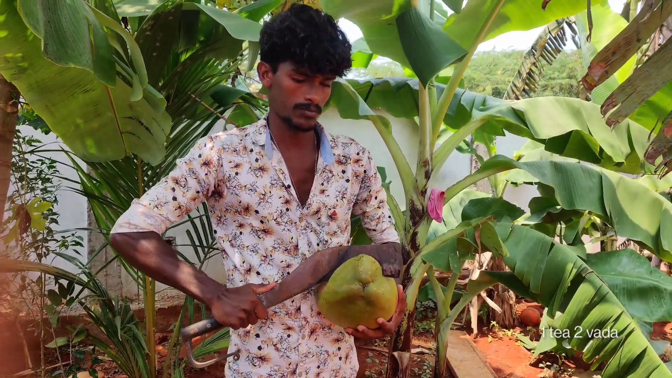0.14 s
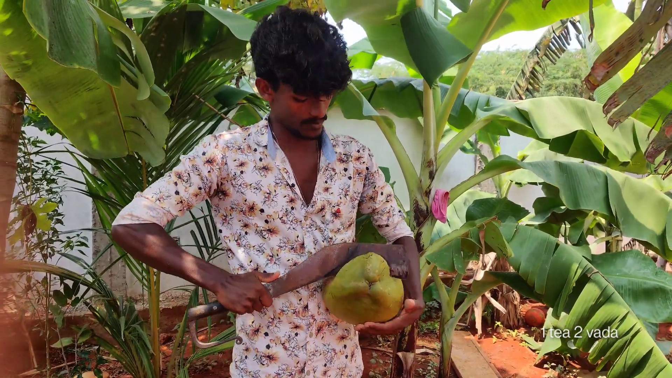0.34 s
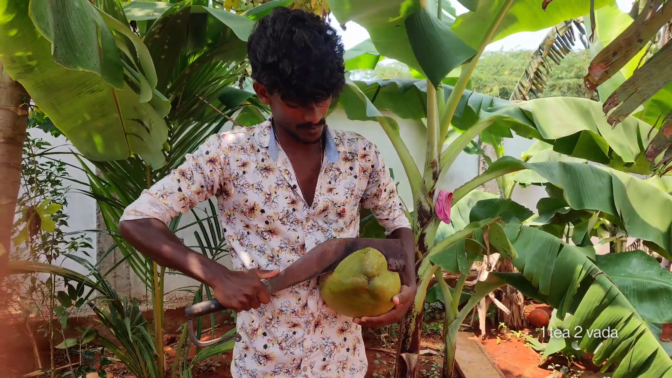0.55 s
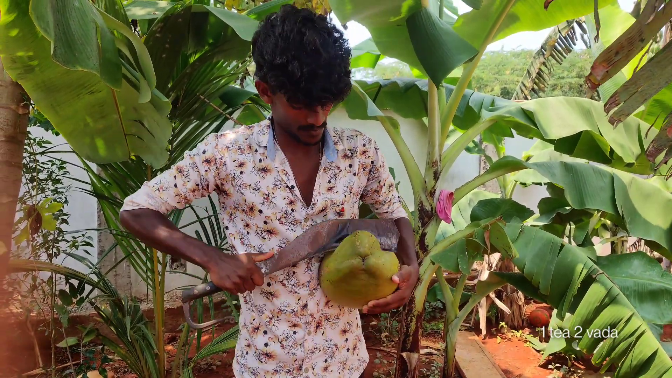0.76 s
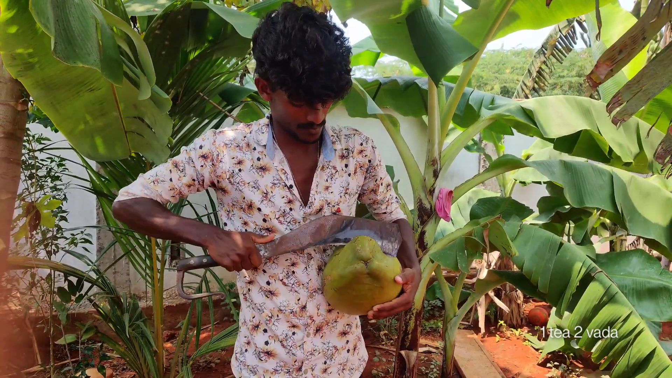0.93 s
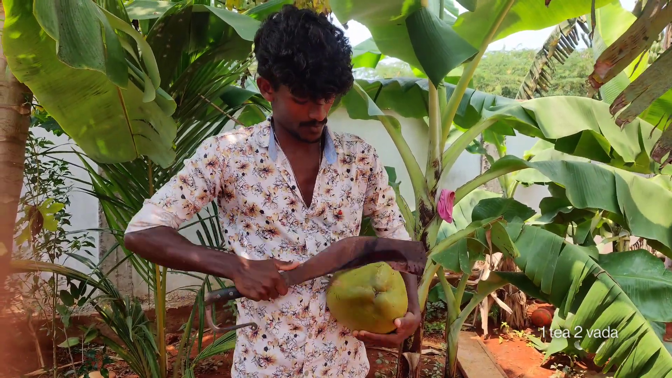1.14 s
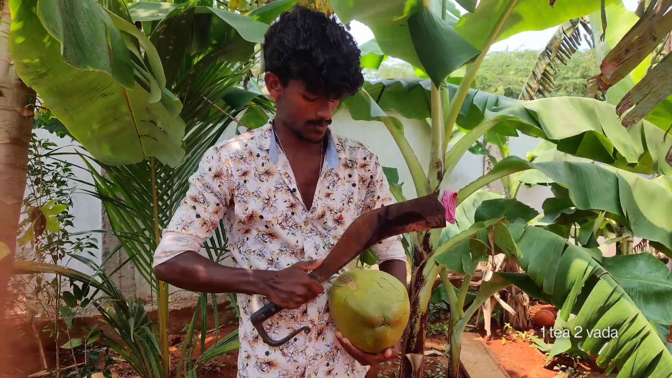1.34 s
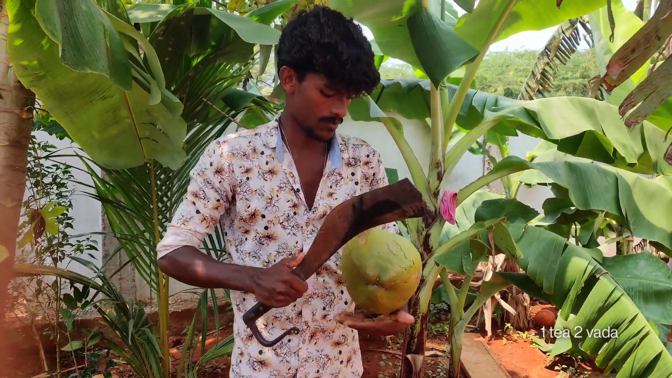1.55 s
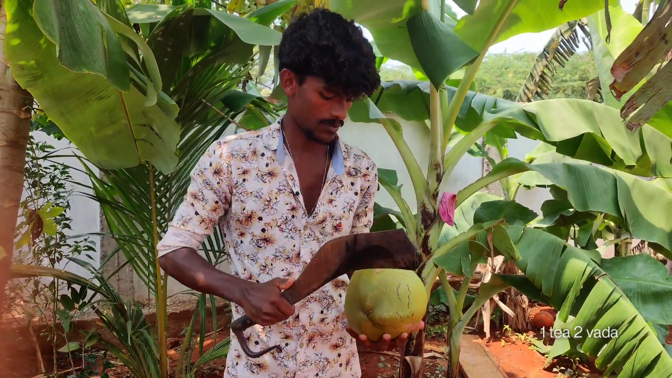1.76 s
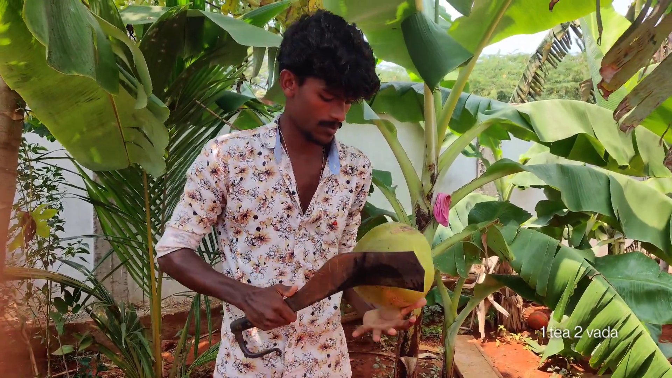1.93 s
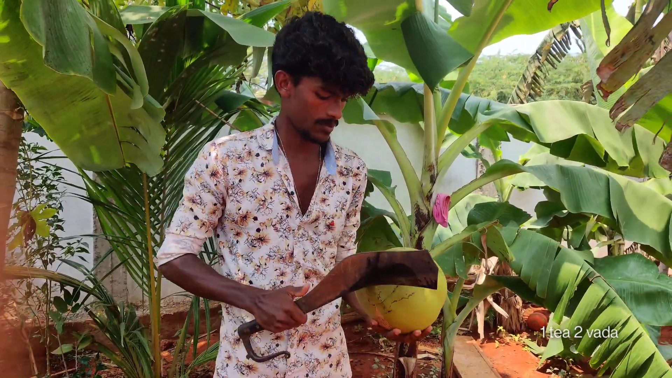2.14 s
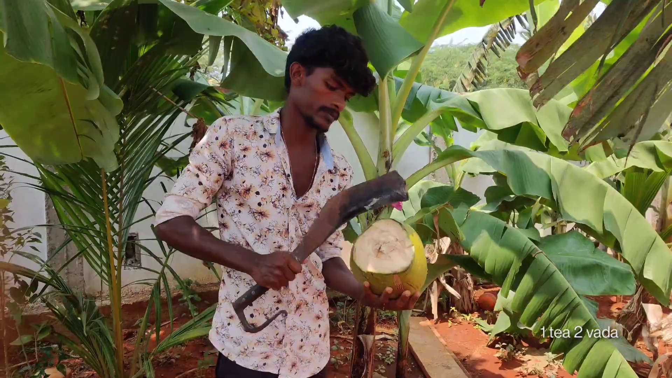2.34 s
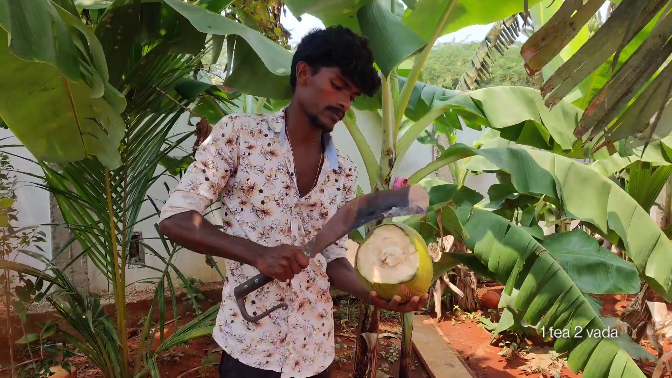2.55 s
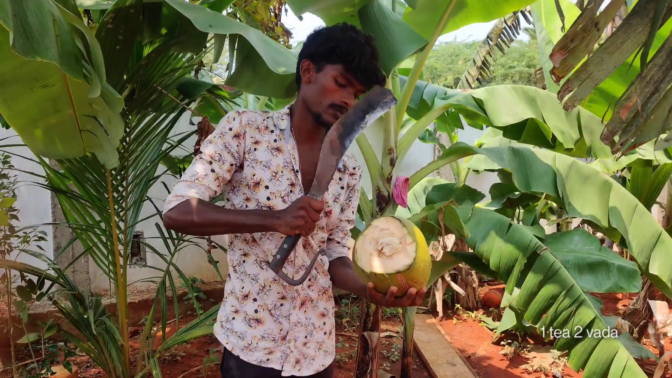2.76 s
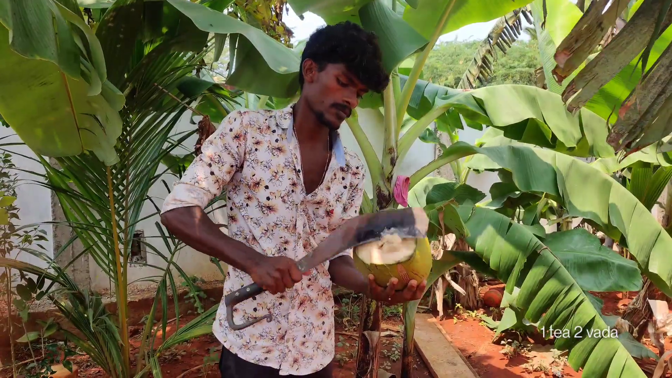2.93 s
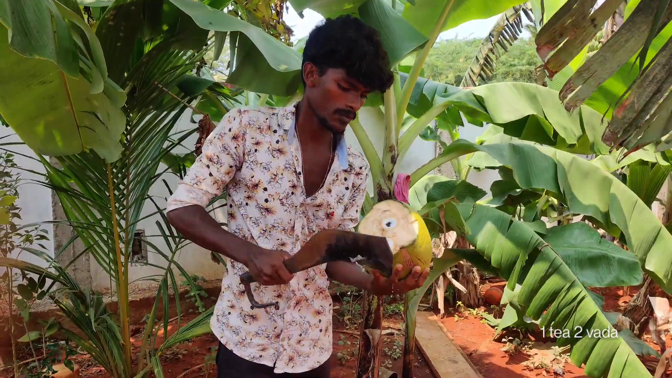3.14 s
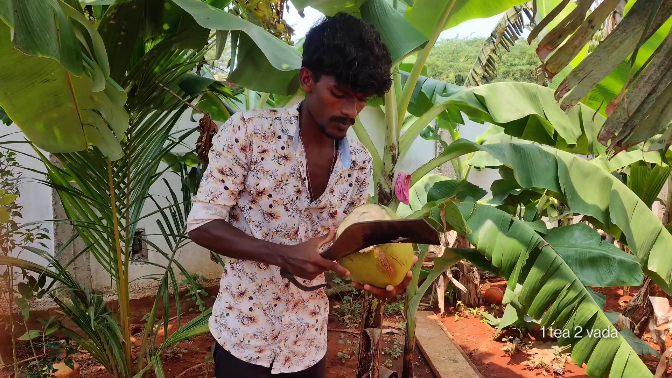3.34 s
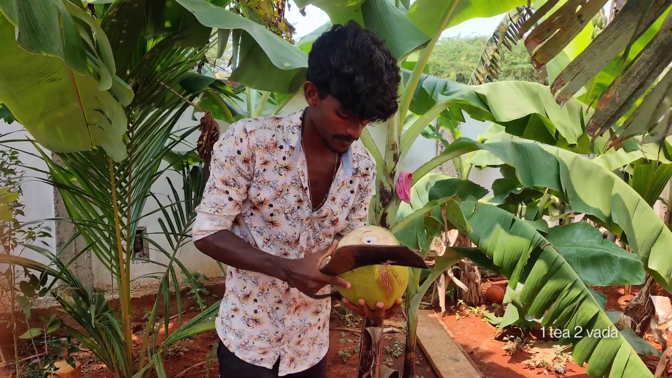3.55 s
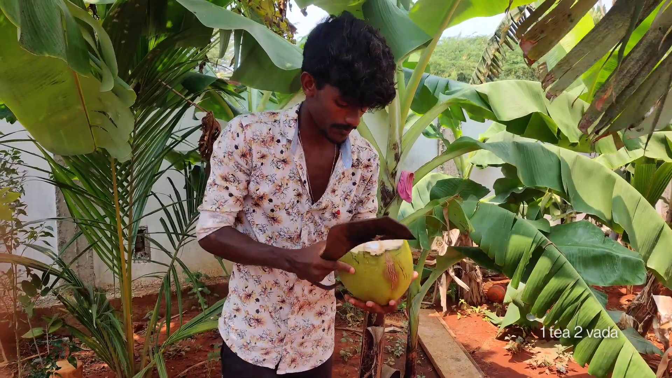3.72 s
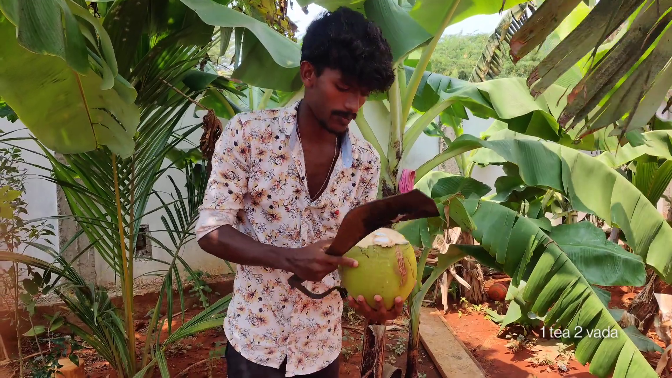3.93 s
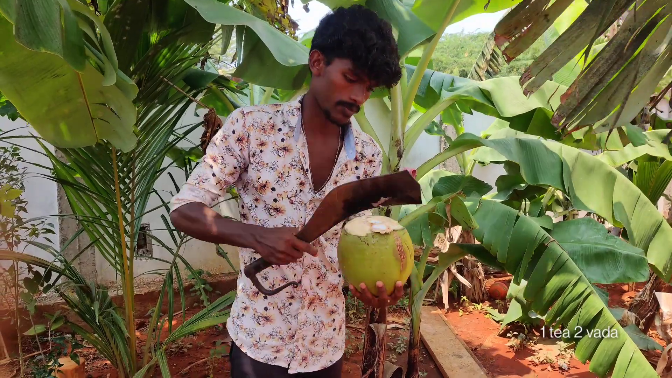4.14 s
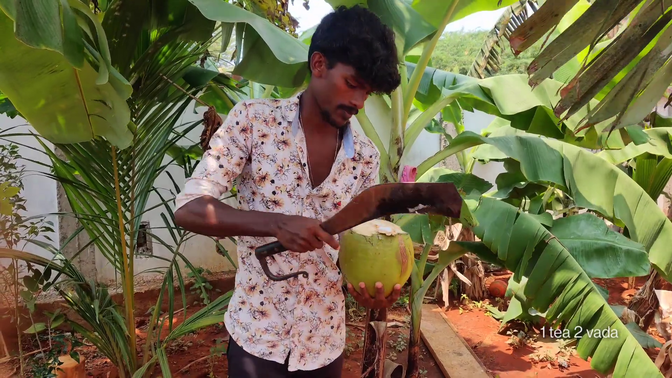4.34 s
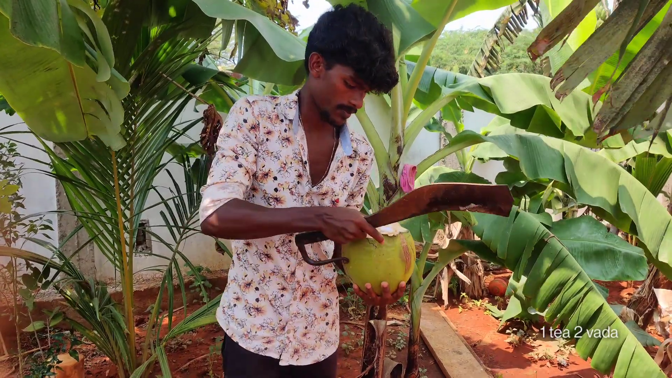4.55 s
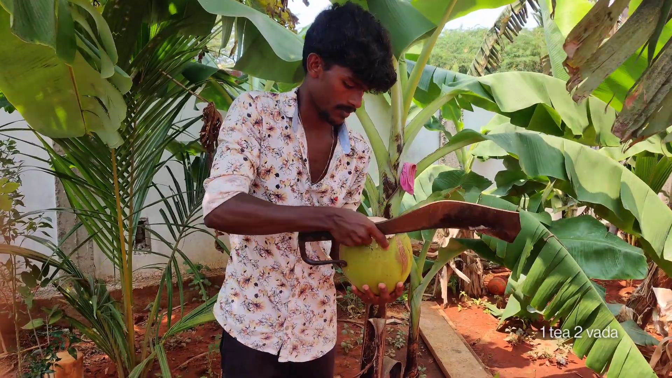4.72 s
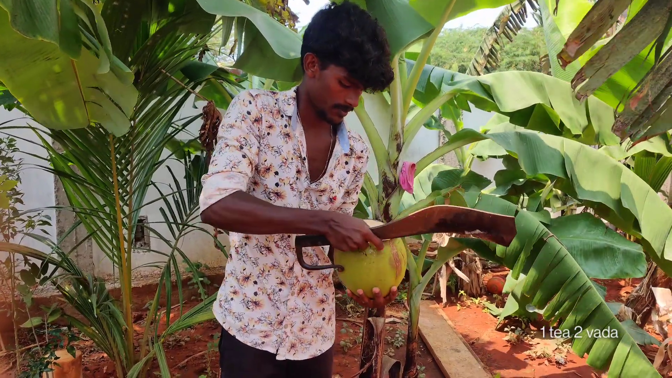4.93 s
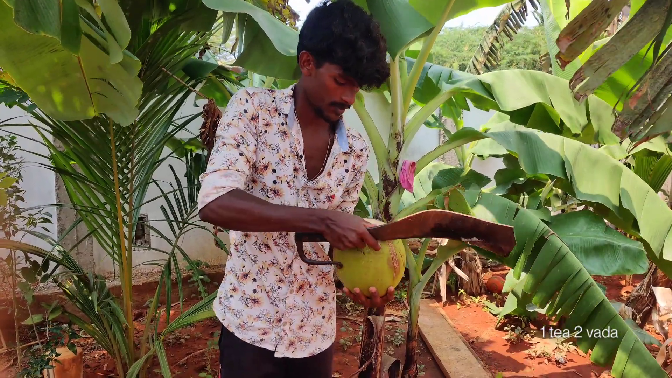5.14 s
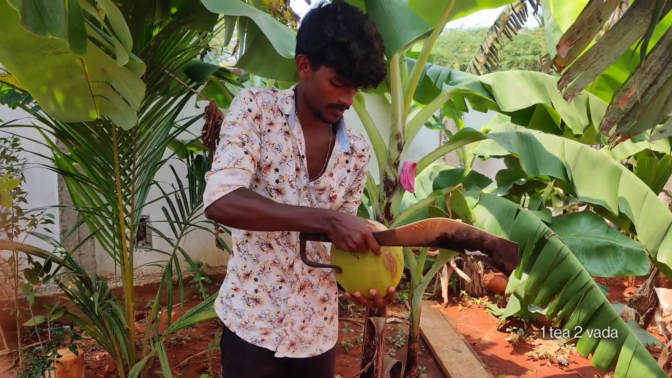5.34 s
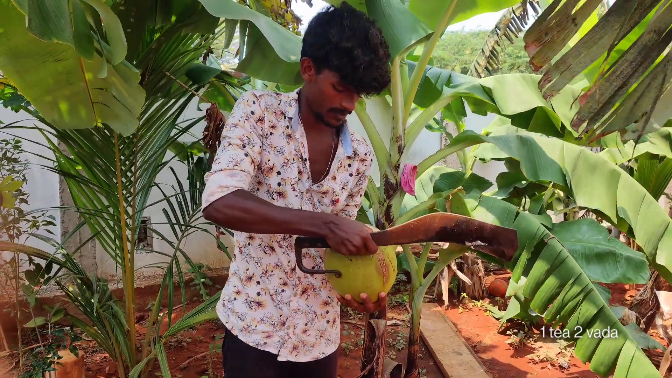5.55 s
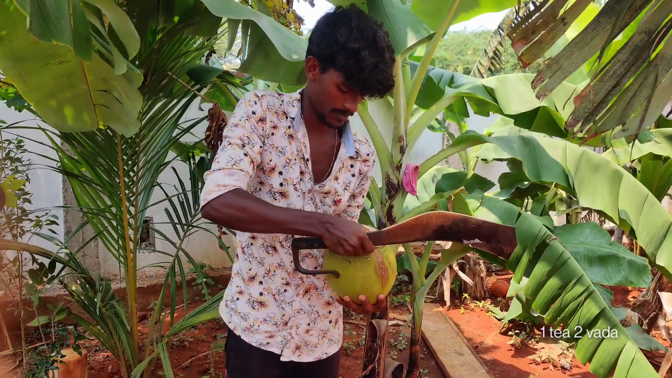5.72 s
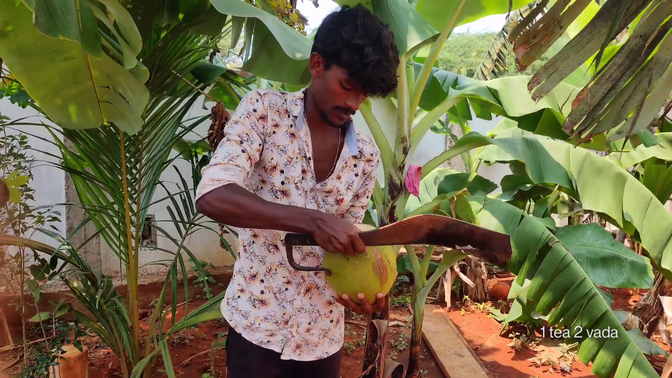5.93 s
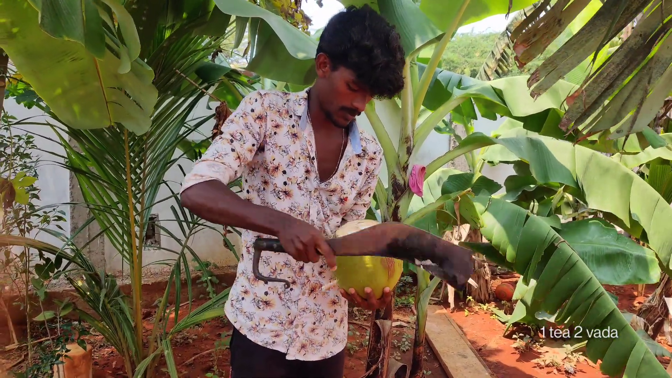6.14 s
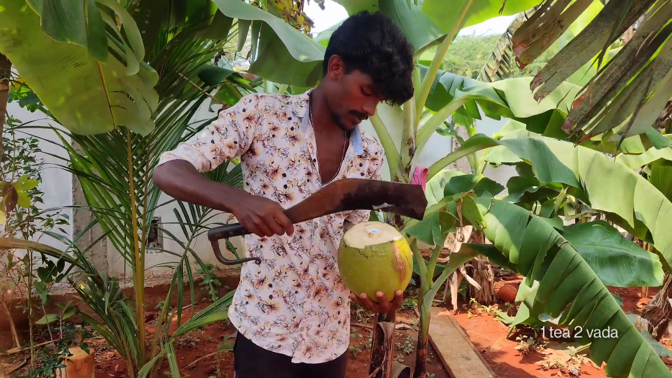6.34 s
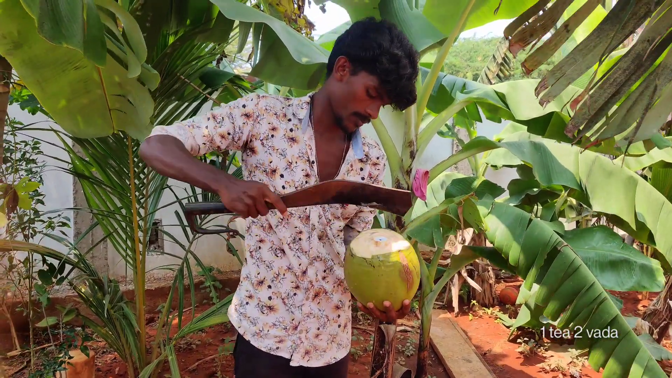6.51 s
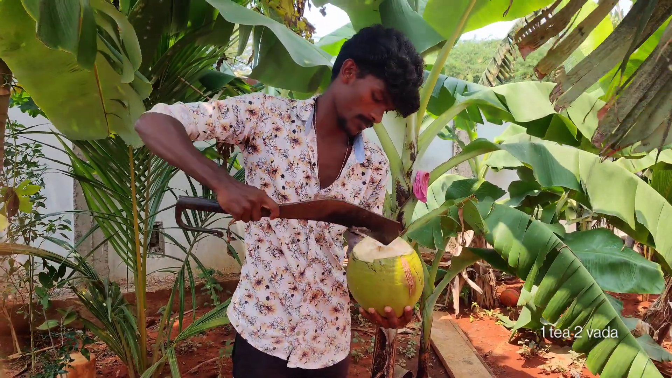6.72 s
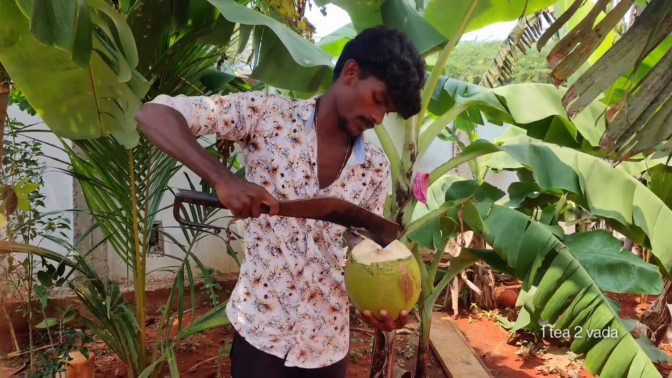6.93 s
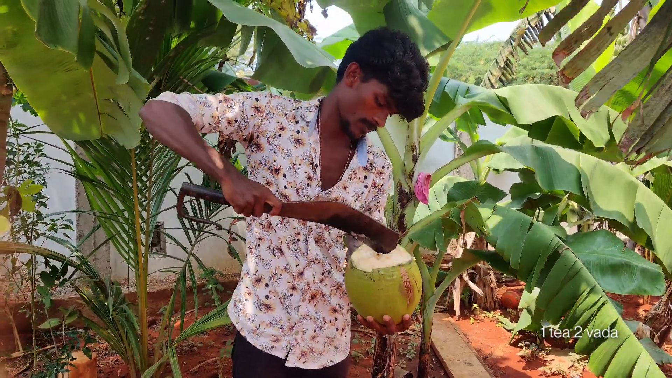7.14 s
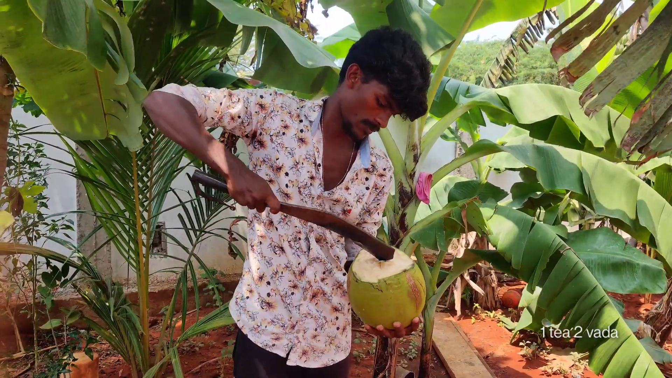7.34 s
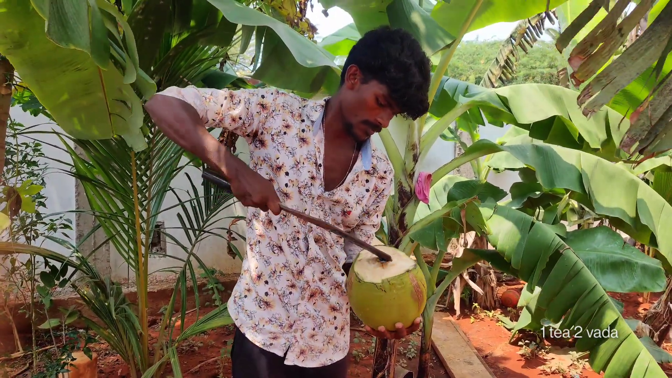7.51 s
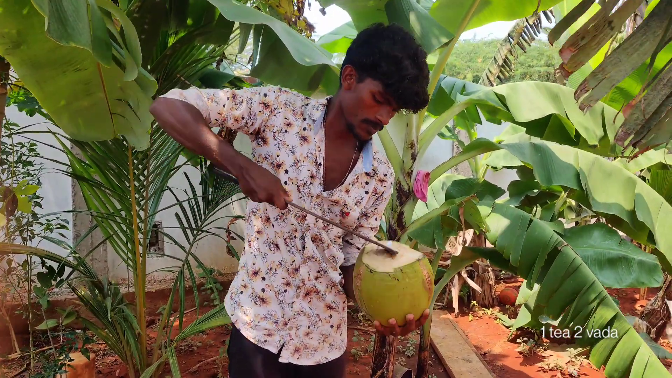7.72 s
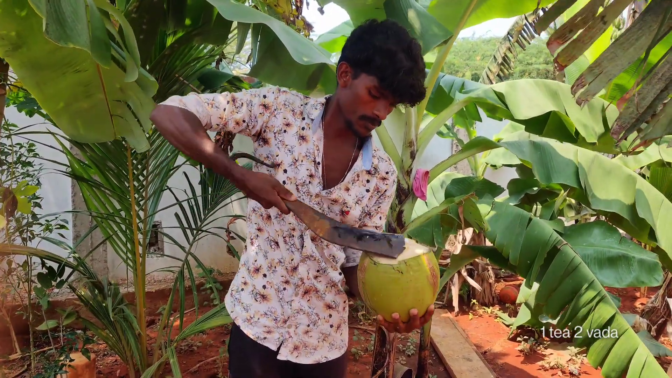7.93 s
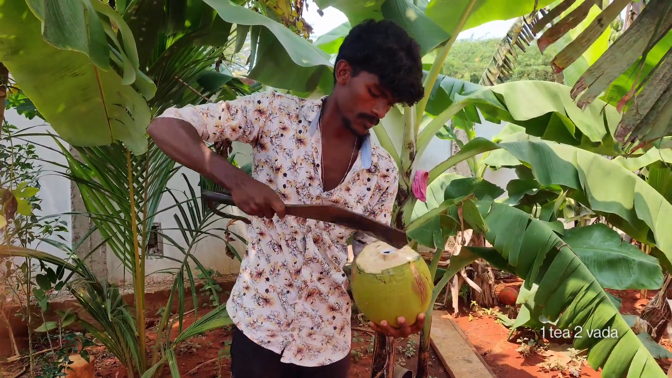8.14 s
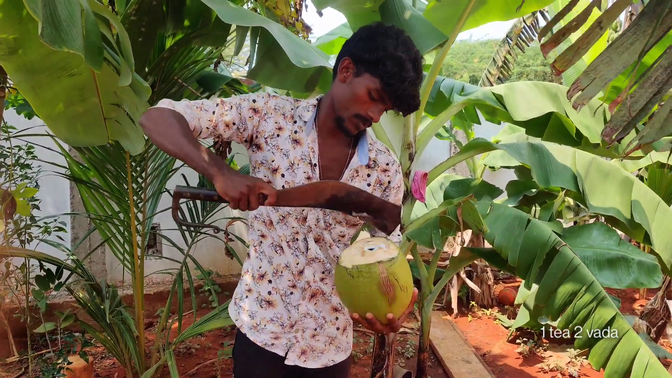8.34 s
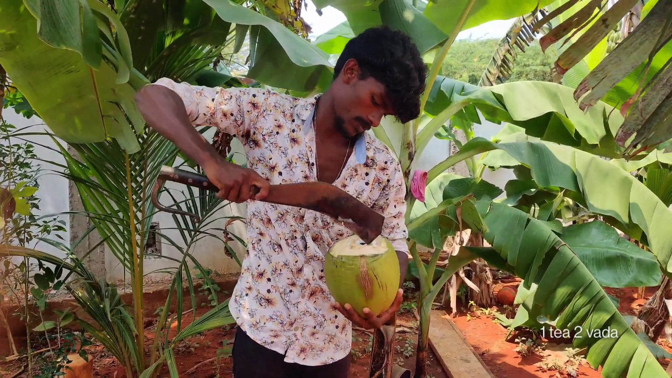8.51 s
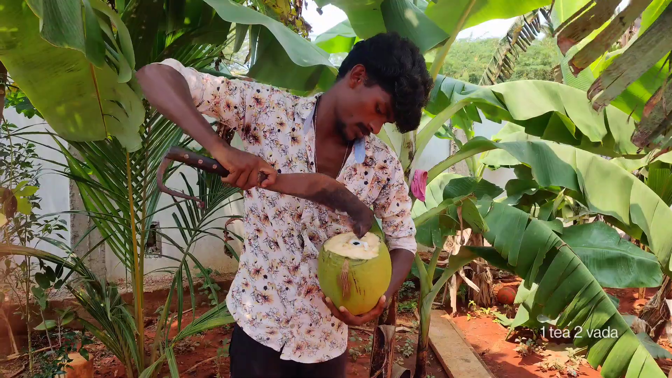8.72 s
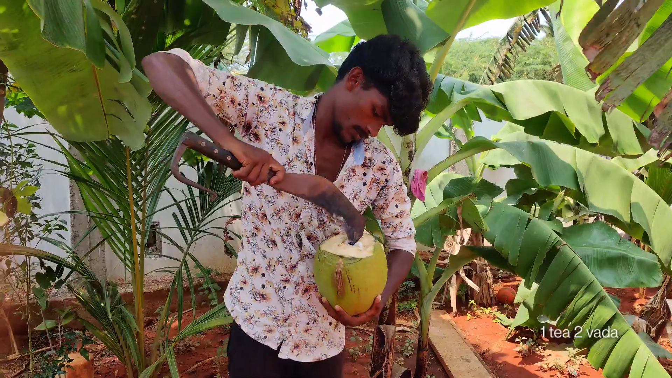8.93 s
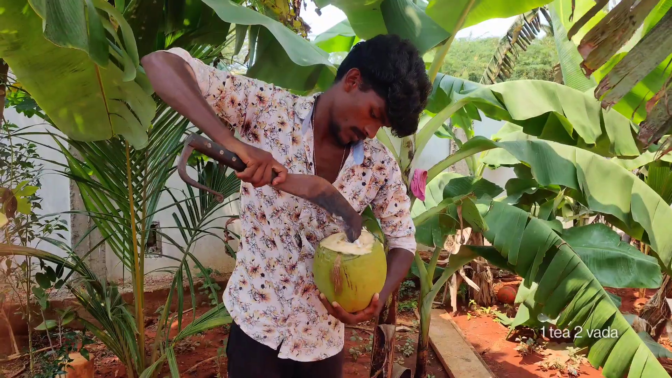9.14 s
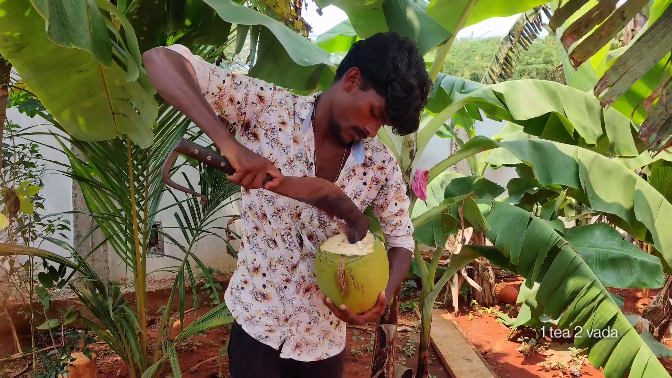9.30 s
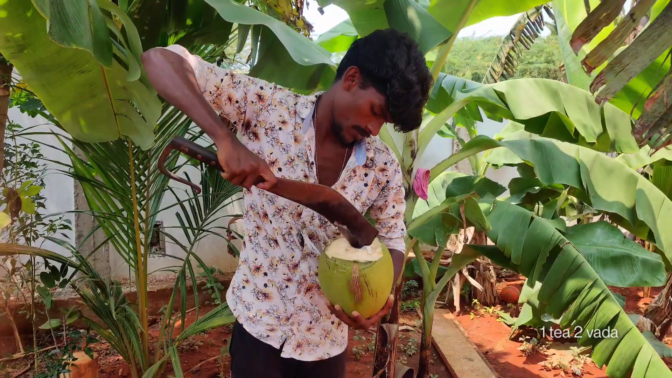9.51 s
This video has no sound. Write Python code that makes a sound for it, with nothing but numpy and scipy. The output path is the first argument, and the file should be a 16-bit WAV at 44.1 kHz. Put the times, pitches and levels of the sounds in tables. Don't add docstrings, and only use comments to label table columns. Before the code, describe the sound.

Close outdoors, a heavy knife scrapes and crunches wet coconut husk, squeals briefly, then chops twice, the second crack by far the loudest. Lighter crunches, fibre ticks and a couple of dull thuds follow as the edge picks at the shell. Wind thumps unevenly against the stereo microphone, leaves rustle faintly, and distant traffic drones.

```python
import sys
import numpy as np
from scipy import signal
from scipy.fft import rfft, irfft, next_fast_len
from scipy.io import wavfile
from scipy.ndimage import uniform_filter1d, map_coordinates

SR = 44100
rng = np.random.default_rng(int(sys.argv[2]) if len(sys.argv) > 2 else 0)


def gain_from_db(level_db):
    decades = np.asarray(level_db, float) / 20
    return 10 ** decades


def transcribe(u):
    v = np.clip(np.atleast_2d(u).T, -1, 1)
    q = np.round(v * 32767).astype(np.int16)
    wavfile.write(sys.argv[1], SR, q)


N = 422037


def unit(x):
    return x / np.sqrt(np.mean(x ** 2) + 1e-20)


def along(points, hz):
    f, v = np.transpose(points)
    return np.interp(np.log(hz + 1), np.log(f + 1), v)


def curves(rows):
    s, *cols = np.transpose(rows)
    return [np.interp(np.arange(N) / SR, s, c) for c in cols]


def wobble(rate_hz):
    knots = rng.standard_normal(int(N * rate_hz / SR) + 4)
    return map_coordinates(knots, [np.arange(N) * rate_hz / SR])


def swells(rows, bluntness=1.2):
    fade_db = 19.5
    t = np.arange(0, N + 64, 64) / SR
    gains = []
    for s, db, rise_s, fall_s, *_ in rows:
        distance = np.abs((t - s) / np.where(t < s, rise_s, fall_s))
        coarse = gain_from_db(db - fade_db * distance ** bluntness)
        gains.append(np.interp(np.arange(N) / SR, t, coarse))
    return gains


def filtered(x, response):
    m = next_fast_len(x.shape[-1] + 4096)
    spectrum = rfft(x, m) * response(np.fft.rfftfreq(m, 1 / SR))
    return irfft(spectrum, m)[..., :x.shape[-1]]


def resonances(modes):
    def response(f):
        return sum((-1) ** k * gain_from_db(db) * 1j * f * w / (c * c - f * f + 1j * f * w)
                   for k, (c, w, db) in enumerate(modes))
    return response


def sides(pan_db):
    return gain_from_db(np.array([pan_db / 2, -pan_db / 2]))


def rush(spectrum, alike, patchy_db):
    z = signal.stft(rng.standard_normal((2, N)), nperseg=512)[2]
    field = uniform_filter1d(rng.standard_normal(z.shape[1:]), 6, 0)
    field = uniform_filter1d(field, 10, 1)
    pair = signal.istft(z * gain_from_db(patchy_db * unit(field)), nperseg=512)[1][:, :N]

    def mid_side(hz):
        turn = np.arccos(np.clip(along(alike, hz), -1, 1)) / 2
        return gain_from_db(along(spectrum, hz)) * [np.cos(turn), np.sin(turn)]
    mid, side = filtered(pair, mid_side)
    return unit(np.array([mid + side, mid - side]))


def blows():
    # t/s, peak level/dB, ring f/Hz, thud level/dB, fizz
    # level/dB
    contacts = [
        (2.4806, -13.5, 4700, -23.5, -11),
        (2.9818, -14.5, 4700, -12.5, -10),
        (2.9856, -7, 4000, -25, -15),
        (2.987, -13, 3920, -13, -14),
        (2.9959, -1, 4550, -28, -20),
        (6.7868, -32, 6900, -5.5, -3),
                (0.8126, -26, 3400, -10, -11), (1.012, -34, 3800, -5, -15), (1.709, -38, 2980, -3, -4),
                (2.053, -30, 2230, -10.5, -11), (2.0593, -29, 3500, 1, 12), (2.4785, -23, 4650, -17, -3),
                (2.4828, -21.5, 5000, -15, -2.5), (2.487, -29, 5000, -15, 1), (2.4987, -31, 4900, -11, -12),
                (3.398, -30.5, 4480, -5, -3.5), (3.4222, -27.5, 2670, -13, -27), (3.433, -32, 5000, -3, 0),
                (4.542, -38.5, 4300, -9, -14), (6.576, -26, 4330, -13, 1.5), (6.578, -31, 3730, -10, -10),
                (6.783, -38, 4000, -8, -1), (9.534, -34, 6000, -18, 11)]
    # f/Hz, width/Hz, level/dB, left-right/dB
    husk = [(6320, 1540, -7.5, 3), (8430, 1150, -12.5, 8.5)]
    # f/Hz, width/Hz, level/dB
    nut = [(724, 450, 5.5), (1790, 860, 4.5)]
    # f/Hz, width/Hz, level/dB
    fizz = [(10400, 7900, -3.5), (15400, 2000, 1)]
    snap_gain, snap_s = 9.9, .00003
    out, t = np.zeros((2, N + SR)), np.arange(SR // 5) / SR

    def upper(f):
        return sum(sides(pan_db)[:, None] * resonances([(c, w, g)])(f) for c, w, g, pan_db in husk)

    for s, db, hz, thud_db, fizz_db in contacts:
        crack = 0.12 + 1.3 / (2 + np.exp(-13 - db))
        shared, own = rng.standard_normal(len(t)), rng.standard_normal((2, len(t)))
        grit = gain_from_db(2.5 * rng.standard_normal(len(t) // 30 + 1)).repeat(30)[:len(t)]
        crunch = grit * gain_from_db(-60 * t / 0.027) * (1 - np.exp(-t / .0003))
        shape = 1.6 * crack * gain_from_db(-60 * t / .006) + (1 - .76 * crack) * crunch
        snap = snap_gain * crack * np.exp(-(t / snap_s - 2) ** 2)
        force = shape * (1.14 * shared + 0.57 * own) + snap
        tail_gain = gain_from_db(-11.5 - 11.5 * crack - 60 * t / 0.16)
        tail = grit * tail_gain * (shared[::-1] + .6 * own[:, ::-1])

        def ring(f, wide):
            return sides(-4.5)[:, None] * resonances([(hz, wide * hz, 0)])(f) ** 3

        def rest(f):
            bright = gain_from_db(0.3 * fizz_db + 4 + 7 * crack) * upper(f)
            thud = gain_from_db(thud_db + 3) * resonances(nut)(f)
            return bright + thud + gain_from_db(fizz_db + 2.0) * resonances(fizz)(f)

        def tearing(f):
            return .65 * ring(f, .59) + .55 * ring(f, 1.8) + gain_from_db(4.3 * crack - 1.5) * rest(f)

        hit = filtered(force, lambda f: ring(f, 1.2 - 0.85 * crack) + rest(f))
        hit += filtered(tail, tearing)
        out[:, round(s * SR):][:, :len(t)] += gain_from_db(db + 3.0) * hit / np.abs(hit).max()
    return out[:, :N]


def strokes():
    # peak t/s, level/dB, rise/s, fall/s, dull minus bright/dB
    drags = [(0.835, -39.5, 0.043, 0.052, -2), (0.872, -44.5, 0.053, 0.039, -7),
             (0.79, -51.5, 0.059, .05, -2), (1.16, -51, 0.12, 0.18, -5), (1.219, -41, 0.058, 0.052, -29),
             (3.512, -53.5, 0.035, 0.11, -12), (3.678, -53.5, 0.051, 0.069, -8),
             (3.838, -57, .07, 0.092, -4), (5.868, -51.5, .04, 0.12, -9), (9.125, -59.5, .05, .03, 0.5),
             (9.03, -63.5, 0.035, .05, 4), (8.92, -61, .02, .04, -8), (9.42, -68, .03, 0.033, 6.5),
             (9.54, -53.5, 0.11, .08, -2)]
    # f/Hz, density/dB per Hz
    bright_spectrum = [(1800, -43), (2800, -4.5), (3500, -4.5), (4700, -1), (6000, -3), (7500, -4.5),
                       (10500, -6), (15500, -5.5)]
    # f/Hz, density/dB per Hz
    dull_spectrum = [(250, -47), (600, -2), (1500, -3), (2600, -3), (4500, -15)]
    grains = unit(gain_from_db(1.2 * wobble(60) + 2.3 * wobble(900)))
    bright = rush(bright_spectrum, [(5000, 0.16)], patchy_db=2.5)
    dull = rush(dull_spectrum, [(1000, 0.69)], patchy_db=1.0)
    gains = swells(drags, bluntness=1.8)
    return grains * sum(gain * (bright + gain_from_db(row[-1]) * dull) for gain, row in zip(gains, drags))


def snaps():
    # t/s, peak level/dB, f/Hz, left-right/dB
    ticks = [(0.4415, -51, 2120, -2.0), (1.555, -49, 2470, 4), (2.4757, -36, 8200, 0),
             (0.8245, -38, 2600, 0), (0.8425, -38, 2300, 0), (0.807, -42, 2800, 0), (2.6448, -54, 2000, -3),
             (3.0918, -53, 2000, 7), (3.7978, -49, 4170, 9), (3.828, -46, 4130, -6), (3.93, -48, 5030, 9),
             (4.233, -48, 2220, 3), (4.4792, -57, 4900, 11), (4.7745, -53, 2330, 18),
             (4.9674, -48, 2890, -1), (5.291, -42.5, 6940, 2), (5.4588, -47.5, 4060, 4),
             (5.579, -49, 4430, 3), (5.8495, -48, 5130, 0), (5.9494, -52, 4450, 0), (6.052, -52, 4060, 12),
             (6.4847, -52, 3490, 7), (7.0329, -64, 4560, -0.5), (7.185, -50, 4000, 6),
             (7.3165, -43.5, 2090, 3), (7.6226, -51, 4600, 10), (7.7214, -61, 2690, -9),
             (8.124, -54, 2340, 19), (8.567, -58, 2160, 7), (8.7103, -52.5, 2690, 12),
             (8.852, -51, 2000, 8), (9.0206, -52, 1500, 4), (9.125, -48, 1600, 10), (9.5111, -49, 2150, 9),
             (9.296, -52, 2330, 15)]
    out, t = np.zeros((2, N + SR)), np.arange(SR // 20) / SR
    for s, db, hz, pan_db in ticks:
        tick = 1.2 * gain_from_db(-60 * t / 0.02) * rng.standard_normal((2, len(t)))
        sound = filtered(tick, lambda f: resonances([(hz, .7 * hz, 0)])(f) + 0.45)
        out[:, round(s * SR):][:, :len(t)] += gain_from_db(db + 2.5) * sides(pan_db)[:, None] * sound
    return out[:, :N]


def knocks():
    # t/s, peak level/dB, f/Hz
    taps = [(1.012, -41.5, 1520), (1.213, -36, 300), (1.225, -36.5, 550), (1.226, -42, 1150),
            (1.709, -45, 840), (1.727, -44, 580), (2.984, -29, 730), (2.984, -31, 440), (3.02, -36, 830),
            (3.403, -37.5, 520), (3.422, -35, 1500), (3.422, -37, 2200), (4.543, -44, 850),
            (7.722, -31, 230), (6.787, -49, 2340), (6.577, -44.5, 2200), (6.578, -46, 4100),
            (6.577, -44, 3050), (4.544, -49.5, 4160), (5.58, -54, 4900), (7.316, -51, 2150),
            (7.625, -50, 4100), (3.401, -41, 930), (2.053, -45, 1930), (2.484, -31, 4850),
            (2.499, -40, 4800), (2.483, -33, 570), (2.481, -42, 2400), (2.494, -43, 2300),
            (3.02, -41, 1400), (9.535, -48, 5700), (9.535, -50, 11000), (6.577, -41, 380),
            (6.787, -47.5, 1480), (1.712, -52, 2330), (9.557, -52, 2200), (7.6, -58, 4900),
            (9.545, -53, 2000), (9.55, -53, 2900)]
    out, t = np.zeros(N + SR), np.arange(SR // 10) / SR
    for s, db, hz in taps:
        tap = gain_from_db(-60 * t / 0.059) * rng.standard_normal(len(t))
        mode = resonances([(hz, min(.45 * hz, 400), 0)])
        out[round(s * SR):][:len(t)] += gain_from_db(db + 17) * filtered(tap, lambda f: mode(f) ** 2)
    return out[:N]


def calls(rows):
    sag, waver = 0.0119, .009 * wobble(13)
    out, flicker = np.zeros((2, N)), gain_from_db(2.6 * wobble(22))
    for start, end, level_db, partials in rows:
        noise, u = rng.standard_normal((2, SR)), np.linspace(0, 1, round((end - start) * SR))
        band = unit(filtered(noise, lambda f: resonances(partials)(f) ** 2))
        speed = 1 + sag * (.5 - u) + waver[round(start * SR):][:len(u)]
        read = SR / 4 + np.cumsum(speed)
        call = [map_coordinates(side, [read]) for side in band]
        envelope = np.abs(np.sin(np.pi * u)) ** 0.43
        out[:, round(start * SR):][:, :len(u)] += gain_from_db(level_db + 2.0) * envelope * call
    return flicker * out


def squeals():
    # (f/Hz, width/Hz, level/dB)
    slips = [
        (1.16, 1.29, -52.5, [(3420, 300, -5), (6200, 700, -7), (9250, 1300, -7)]),
        (6.784, 6.797, -49, [(4700, 170, 0)]),
        (1.19, 1.248, -42.5, [(10100, 2600, 1), (14000, 2800, -2.5)]),
        (1.172, 1.187, -53, [(6000, 500, 0)]),
        (1.177, 1.19, -49, [(8300, 300, 0)]),
        (1.188, 1.208, -56, [(2980, 160, 0)]),
    ]
    return calls(slips)


def swing():
    # t/s, length/s, size (full scale), leak time/s
    pushes = [
        (2.49, .42, .35, .33),
        (2.48, .7, .115, .15),
    ]
    t = np.arange(N) / SR
    out = []
    for s, length_s, size, leak_s in pushes:
        hump = np.sin(np.pi * np.clip((t - s) / length_s, 0, 1))
        vent = lambda f: 2j * np.pi * f * leak_s / (1 + 2j * np.pi * f * leak_s)
        out.append(size * filtered(hump, vent))
    return np.array(out)


def yard(x):
    # f/Hz, t60/s
    decay = [(300, 0.22), (4500, 0.2), (12000, 0.14)]
    hz, t, z = signal.stft(rng.standard_normal((2, SR // 3)), SR, nperseg=256)
    tail = signal.istft(z * gain_from_db(-60 * t / along(decay, hz)[:, None]), SR, nperseg=256)[1]
    delayed = np.pad(x, ((0, 0), (150, 0)))
    return signal.fftconvolve(delayed, tail / np.linalg.norm(tail[0]), axes=1)[:, :N]


def wind():
    # t/s, strength/dB, left-right/dB
    gusts = [(0, -52.5, 9), (.3, -47, -12), (.5, -39, 6), (.95, -39, -11), (1.4, -36.5, 6.5),
             (1.65, -42, 6), (1.95, -57.5, 2), (3.25, -52, -6), (3.5, -41.5, 2.5), (3.9, -40, -1),
             (5.1, -40.5, -5.5), (6.1, -41.5, 1.5), (6.9, -44, -0.5), (7.65, -44, 1), (7.9, -40.5, 0),
             (8.68, -46.5, -1), (8.9, -33, 0.5), (9.57, -37, 2)]
    # f/Hz, density/dB per Hz
    buffet_spectrum = [(4, -22), (12, 4.5), (25, 0.5), (50, -5), (75, -13), (130, -59), (300, -120)]
    # f/Hz, density/dB per Hz
    flutter_spectrum = [(30, -120), (55, -14), (80, -2.5), (120, -6.5), (180, -17.5), (300, -26),
                        (900, -73)]
    strength_db, pan_db = curves(gusts)
    mean_db = strength_db.mean()
    gust_db = strength_db - mean_db + 1.25 * wobble(5.5)
    veer_db = 2.5 * wobble(6.5)
    lumps = np.array([wobble(14), wobble(13)])
    buffet = unit(gain_from_db(2.6 * lumps) * rush(buffet_spectrum, [(30, 0.24)], patchy_db=-0.8))
    flutter = unit(gain_from_db(3 * lumps) * rush(flutter_spectrum, [(30, 0.33)], patchy_db=1.7))
    both = gain_from_db(gust_db) * buffet + gain_from_db(-17 + 1.69 * gust_db) * flutter
    return gain_from_db(mean_db + 3.0) * sides(pan_db + veer_db) * both


def eddies():
    # middle t/s, peak level/dB, # f/Hz, left-right/dB
    slaps = [(0.461, -30, 55, 4), (0.535, -21, 66, -14), (0.831, -28, 60, -20), (0.885, -22, 72, -22),
             (1.167, -31, 51, 4), (1.221, -23, 76, 15), (1.387, -20, 67, -2), (1.448, -21.5, 61.4, 9),
             (1.55, -25, 73, 20), (1.59, -27, 69, 4), (1.633, -26, 132, 17), (2.989, -31, 88, 22),
             (3.091, -37, 73, 15), (3.428, -24, 49, -21), (3.543, -34, 43, 18), (3.579, -20.5, 76, 22),
             (3.657, -25.5, 52, 22), (3.857, -24, 59, -22), (3.936, -27, 53, -16), (4.043, -32, 70, 24),
             (4.196, -32, 49, -21), (4.239, -19, 60, -15), (4.297, -27, 52, -22), (4.537, -20, 52, -22),
             (4.938, -27, 66, -9), (5.04, -23.5, 63, 22), (5.09, -29, 52, 10), (5.22, -29, 61, -14),
             (5.273, -27.5, 57, -16), (5.612, -30.5, 78, -22), (5.96, -30, 57, 20), (6.017, -32, 56, 9),
             (6.525, -31, 66, 22), (6.69, -29, 49.6, -14), (7.119, -32, 62, -3), (7.731, -23.5, 91, -22),
             (7.844, -23.5, 69, -21), (8.44, -28, 77, -16), (8.934, -29, 52, 19), (9.016, -19, 67, -8),
             (9.074, -24, 59, 19), (9.131, -26, 61, 24), (9.181, -22, 70, 11), (9.219, -28, 63, 9),
             (9.299, -23, 73, -1.5), (1.228, -28, 230, 0), (9.354, -24, 79, -8), (9.442, -23, 78, -21),
             (9.551, -29, 92, 19)]
    # onset t/s, peak level/dB, f/Hz, left-right/dB
    flicks = [(0.528, -45, 121, -17.5), (0.605, -36, 153, 18.0), (0.746, -47, 215, 8.5),
              (1.376, -38, 121, 8.0), (1.446, -43, 145, 6.0), (1.625, -37, 121, 21.5),
              (3.083, -45, 127, 16.0), (3.425, -43, 121, 2), (3.565, -39, 121, 21.0),
              (3.659, -48, 121, 9.0), (4.538, -47, 121, -11.0), (5.034, -43, 121, 15.5),
              (6.424, -45, 127, -13.0), (7.721, -35, 121, -19.5), (7.914, -51, 121, 6.5),
              (8.038, -50, 121, 5.0), (8.434, -47, 122, -16.0), (8.616, -50, 121, 11.5),
              (8.982, -39, 124, -4), (9.075, -41, 156, 15.0), (9.153, -39, 153, 11.5), (9.292, -38, 121, 3)]
    onset_to_middle_s, half_length_cycles = 0.0061, 0.54
    out, t = np.zeros((2, N)), np.arange(-SR // 20, SR // 20) / SR
    for s, db, hz, pan_db in slaps + [(row[0] + onset_to_middle_s, *row[1:]) for row in flicks]:
        phase = rng.uniform(0, 2 * np.pi, (2, 1))
        slap = np.exp(-(t * hz / half_length_cycles) ** 2) * np.cos(2 * np.pi * hz * t + phase)
        near = out[:, round(s * SR) - SR // 20:][:, :len(t)]
        slap = gain_from_db(db - abs(pan_db) / 2) * sides(pan_db)[:, None] * slap
        near += slap[:, :near.shape[1]]
    return out


def hiss():
    # f/Hz, density/dB per Hz
    spectrum = [(30, -19), (60, 0), (110, -4.5), (200, -10), (400, -14.5), (800, -16.5), (1200, -21.5),
                (2200, -21), (3400, -26.5), (8000, -29), (16000, -30)]
    noise = rush(spectrum, [(100, 1.0), (640, 0.17), (1400, 0)], patchy_db=2.0)
    return gain_from_db(-56.0 + 0.56 * wobble(2.98)) * noise


def thin_leaves():
    # t/s, stir level/dB
    stir = [(0.0, -65.5), (0.42, -66.5), (0.74, -60.5), (1.01, -56), (2.03, -68), (2.4, -78), (2.66, -61.5),
            (3.65, -58), (4.53, -60), (4.72, -55.5), (6.98, -62.5), (8.1, -61), (8.23, -62.5),
            (8.53, -66.5), (9.41, -62), (9.57, -60)]
    # f/Hz, density/dB per Hz
    spectrum = [(300, -57), (900, -8.5), (2200, -0.5), (3200, 0), (5200, 0), (6800, -8.5), (15500, -13)]
    stir_db, = curves(stir)
    crackle = unit(gain_from_db(0.97 * wobble(11) + 1.83 * wobble(90)))
    return gain_from_db(stir_db + 2.0) * crackle * rush(spectrum, [(1000, 0.024)], patchy_db=1.5)


def broad_leaves():
    flaps = [
        (1.1, -59, .6, 1.1),
        (1.65, -70, 0.87, 0.19),
        (3.1, -68, 0.43, 1.8),
        (4.7, -67, 0.54, 0.76),
        (6.15, -66, 0.77, 0.59),
        (7.95, -67.5, 0.72, 0.25),
        (8.95, -72, .2, 1.5),
    ]
    # f/Hz, density/dB per Hz
    spectrum = [(250, -54), (500, -2.5), (900, -5.5), (1500, -12), (3000, -46)]
    gain = gain_from_db(-79) + sum(swells(flaps))
    return gain * rush(spectrum, [(700, 0.06)], patchy_db=3.0)


def birds():
    # (f/Hz, width/Hz, level/dB)
    songs = [(4.55, 5.08, -61.5, [(2330, 80, 0.5), (2710, 70, 0), (3110, 130, 0)]),
             (7.74, 8.27, -59.5, [(2310, 130, -3.5), (2800, 500, -7.5), (3140, 130, 0), (3505, 120, -8)]),
             (8.165, 8.21, -65, [(3500, 80, 0)]), (6.228, 6.35, -59, [(4890, 40, 2)]),
             (6.69, 6.76, -63, [(2750, 700, 0)]), (6.92, 7.0, -67, [(2800, 500, 0)]),
             (7.17, 7.26, -68, [(2700, 400, 0)]), (7.29, 7.42, -68, [(3050, 500, 0)]),
             (9.349, 9.362, -56, [(7300, 2000, 0)]), (9.362, 9.425, -62.5, [(7900, 900, -4)]),
             (9.445, 9.485, -59.5, [(7000, 2000, 0)]), (9.55, 9.568, -55, [(7200, 2500, 0)])]
    return calls(songs)


def traffic():
    # peak t/s, level/dB, rise/s, fall/s
    surges = [(1.25, -59, 0.82, 0.86), (2.06, -63, 0.051, 0.063), (3.0, -66, 0.54, 3.5),
              (4.7, -63, 0.19, 1.5), (6.06, -57, 0.073, 0.14), (6.29, -54.5, 0.042, 0.17),
              (6.59, -61, 0.087, 0.04), (6.74, -66, 0.036, 0.15), (7.86, -68, .1, 0.69),
              (8.96, -64, 0.5, 0.24), (9.3, -59, 0.034, 0.86)]
    # f/Hz, width/Hz, level/dB
    road = [(233, 122, -2.5), (361.5, 127, 0)]
    noise = rush([(100, 0)], [(300, 0.9)], patchy_db=2.0)
    drone = unit(filtered(noise, lambda f: resonances(road)(f) ** 2))
    return (gain_from_db(-66) + sum(swells(surges))) * drone


def engines():
    hums = [
        (1.9, -53.5, 6.2, 1.9, 59.2),
        (2.2, -58, 3.2, 1.6, 94.3),
        (4.3, -61.5, 6.7, 3, 128.6),
        (7.6, -55.5, 2.4, 3.5, 97.9),
    ]
    width_hz = 11.4
    noise = rng.standard_normal((2, N)) + 0.98 * rng.standard_normal(N)
    out = np.zeros((2, N))
    for gain, row in zip(swells(hums), hums):
        mode = resonances([(row[-1], width_hz, 0)])
        out += gain * unit(filtered(noise, lambda f: mode(f) ** 2))
    return out


def scene():
    lead_samples = 1.12
    skew = lead_samples / 2 * np.array([[-1], [1]])
    knife = filtered(blows() + snaps() + knocks(), lambda f: np.exp(2j * np.pi * f / SR * skew))
    near = knife + gain_from_db(-12.0) * yard(knife) + strokes() + squeals() + swing()
    air = wind() + eddies() + hiss() + thin_leaves() + broad_leaves()
    return near + air + birds() + traffic() + engines()


def roll_off(x):
    return signal.sosfilt(signal.butter(12, 16800, fs=SR, output="sos"), x)


def record(dry):
    ducks = [
        (2.5507, 2.561, -1.6),
        (2.9866, 3.089, -7),
    ]
    top_hz = 15790
    t = np.arange(N) / SR
    need = gain_from_db(sum(db * ((t > start) & (t < end)) for start, end, db in ducks))
    gain = np.minimum(need, uniform_filter1d(need, size=81, origin=40))
    mix = filtered(dry * gain, lambda hz: gain_from_db(-35 * (hz > top_hz)))
    return roll_off(mix)


dry = scene()
out = record(dry)
transcribe(out)
```